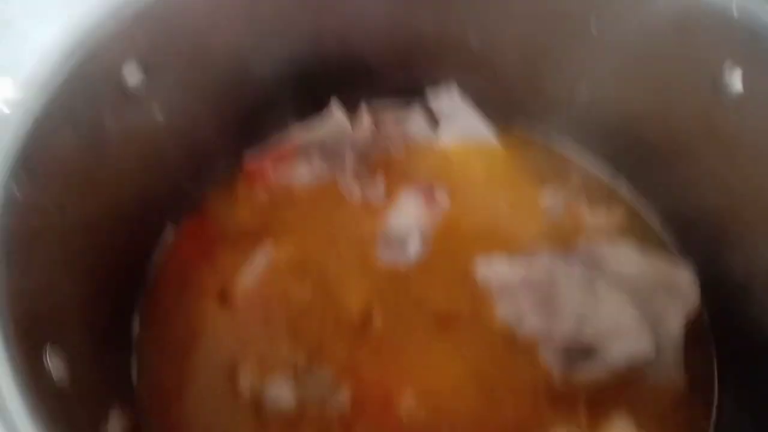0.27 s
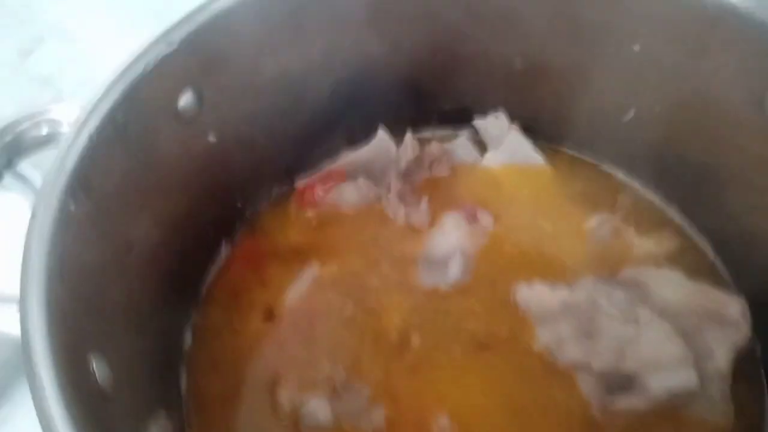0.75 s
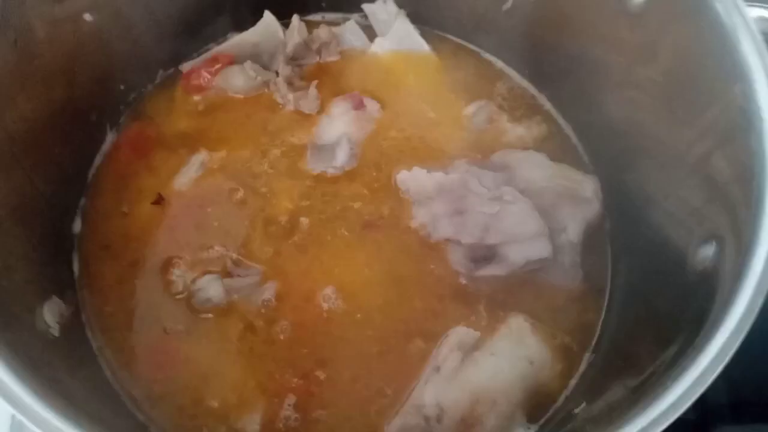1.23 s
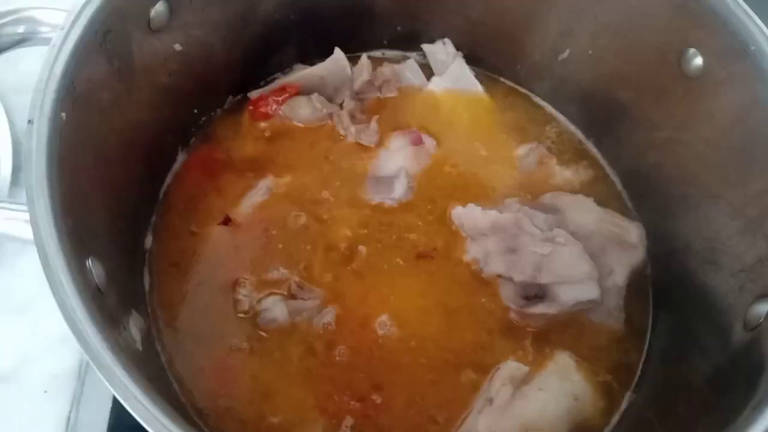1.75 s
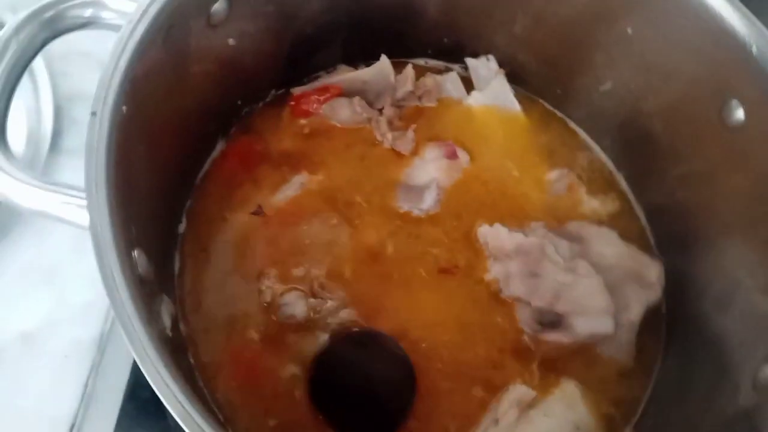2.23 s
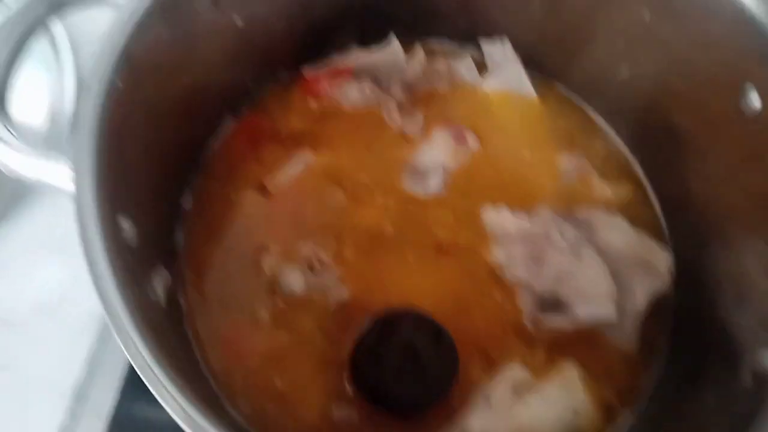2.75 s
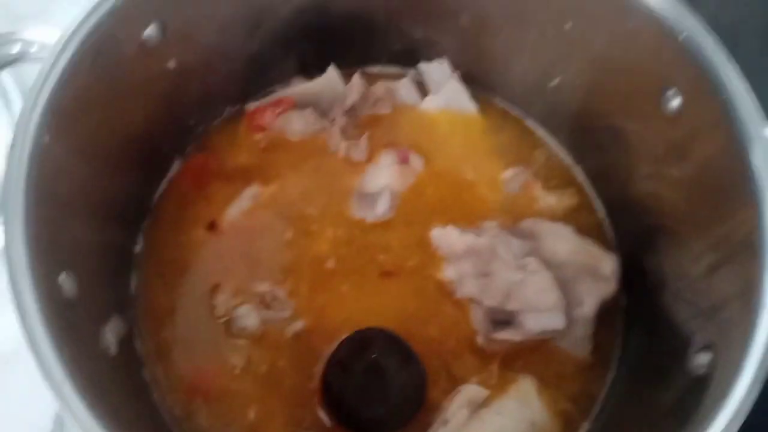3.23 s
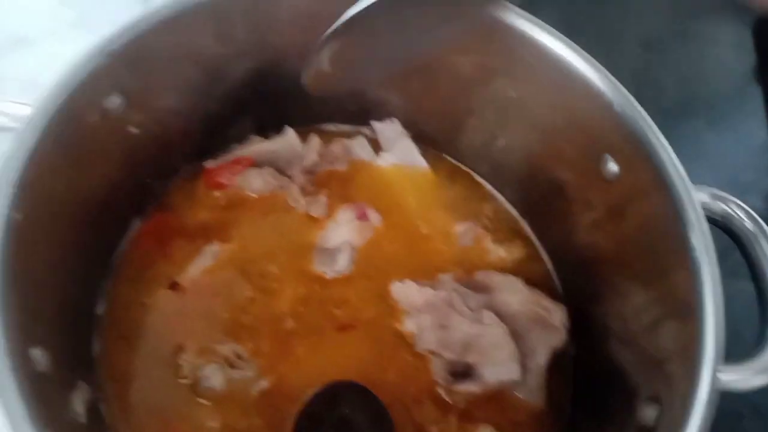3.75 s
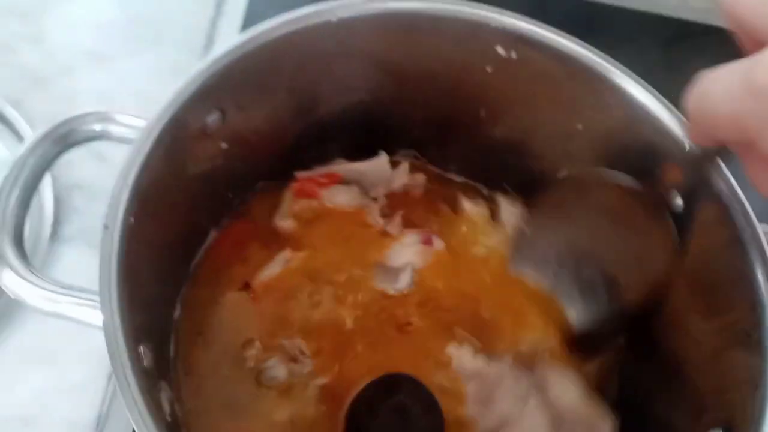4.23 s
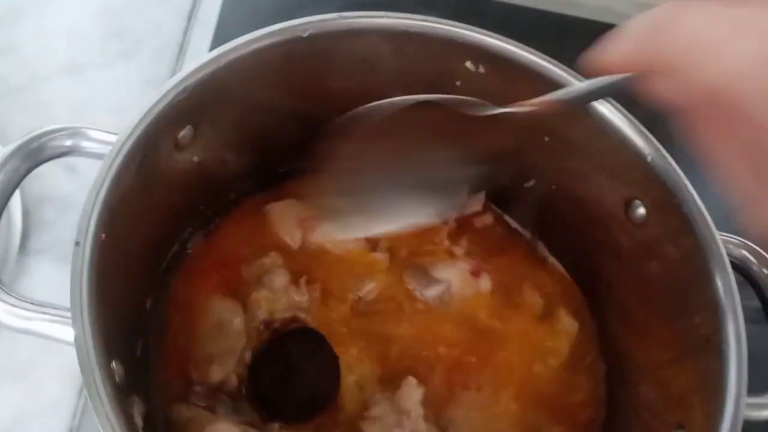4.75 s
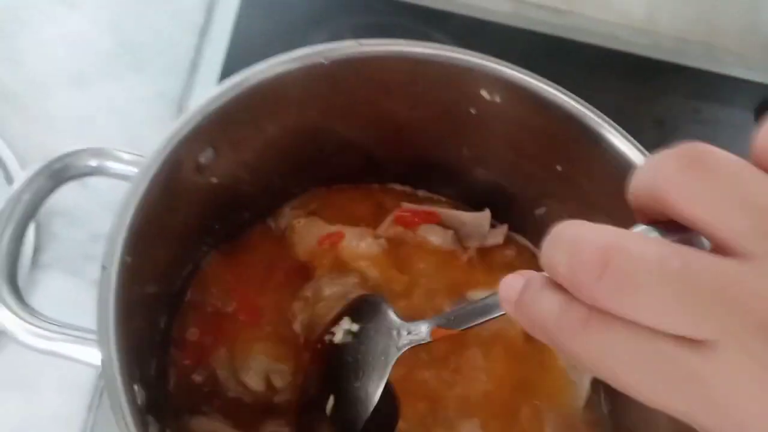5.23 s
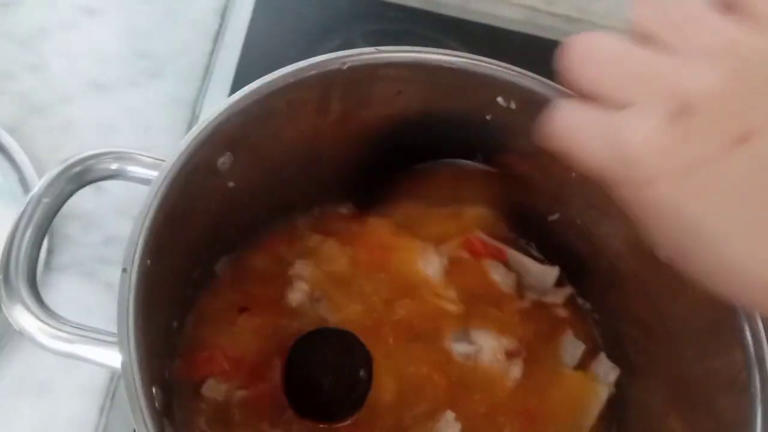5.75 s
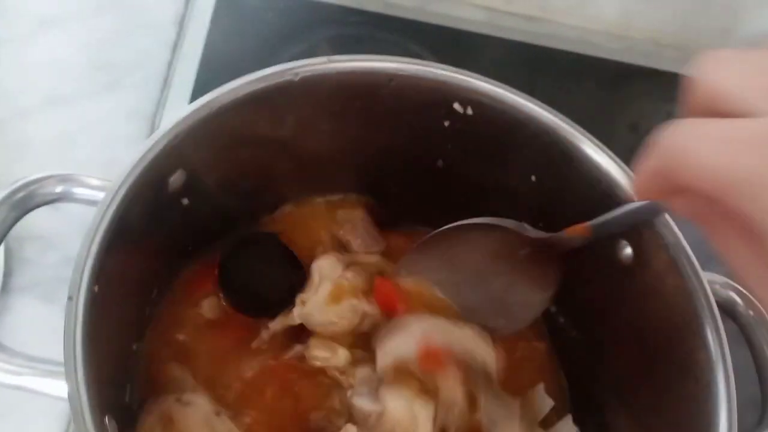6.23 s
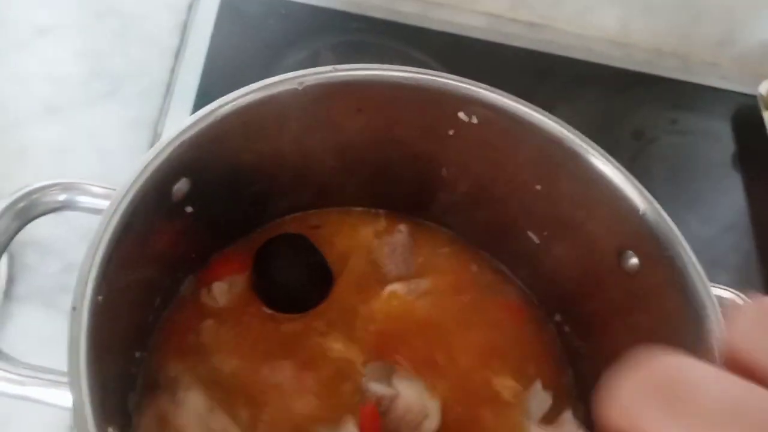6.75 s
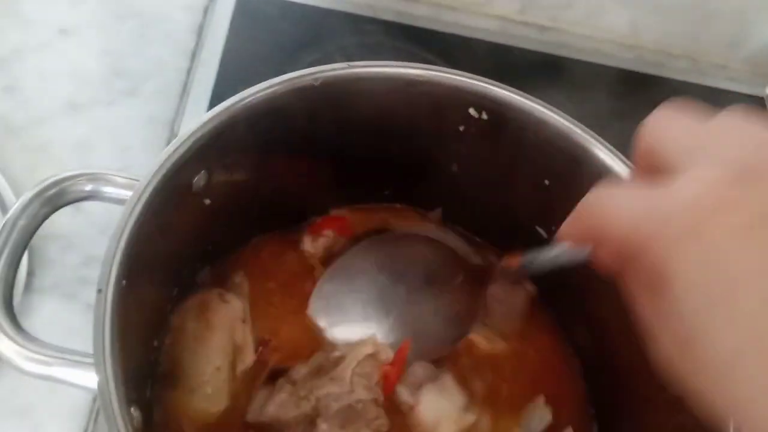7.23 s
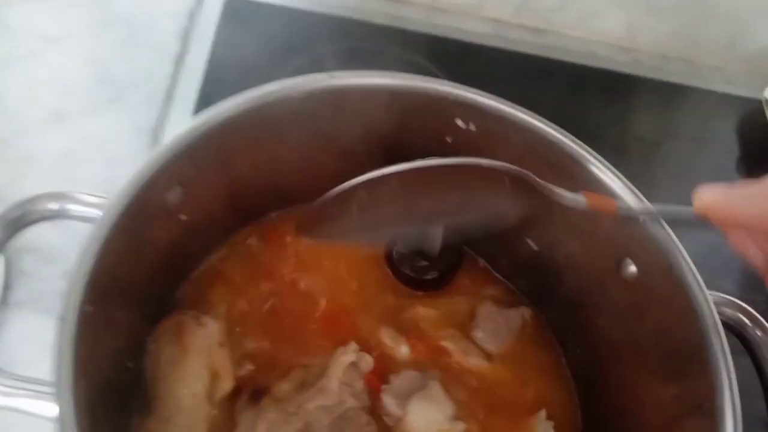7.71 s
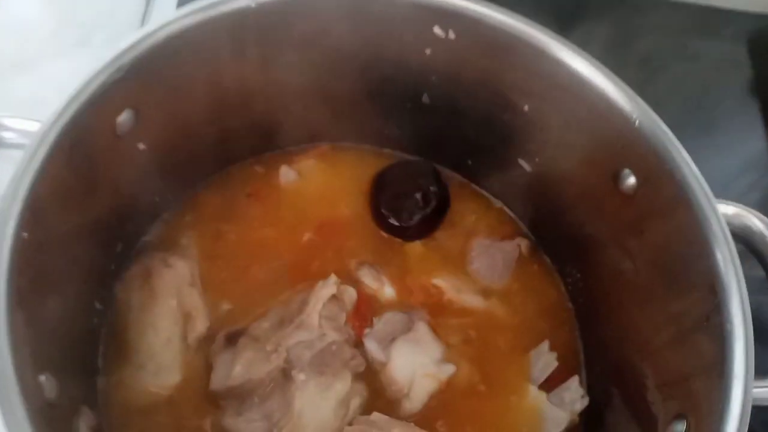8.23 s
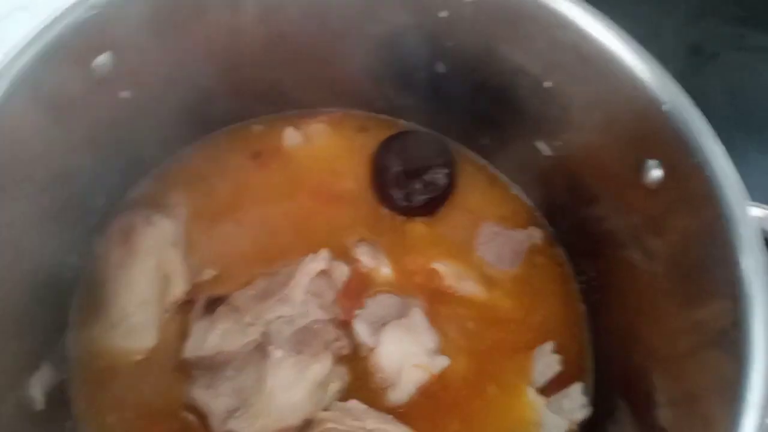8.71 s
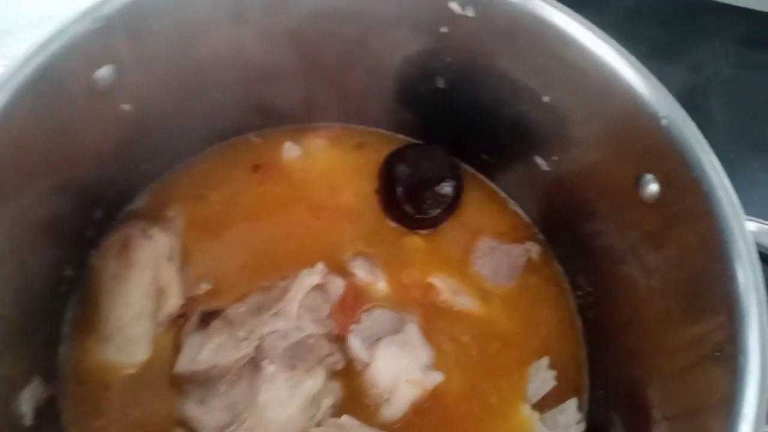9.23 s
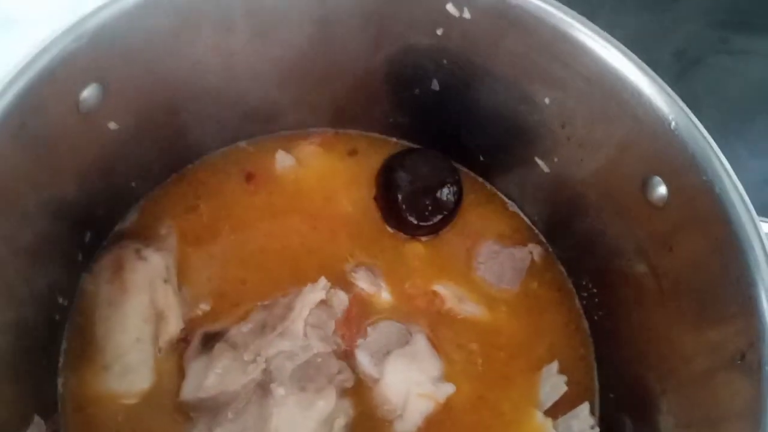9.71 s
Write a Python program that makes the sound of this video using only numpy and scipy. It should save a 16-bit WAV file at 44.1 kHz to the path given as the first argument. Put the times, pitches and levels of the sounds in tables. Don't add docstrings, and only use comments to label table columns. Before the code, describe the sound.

A small hard kitchen heard close up, with soft hiss, faint hum and low handling rumble throughout. In the first half second stew burbles weakly with a light scrape; small ticks and a brief wet scuff follow near 0.7 and 1.3 s, more ticks around 2. From 2.6 to 3.1 s a steel spoon clinks brightly on the worktop, strongest near 2.9. At 3.86 s it hits the steel pot with a loud crack and short ring, then lighter taps to 4.4 and ticks around 4.7. Gritty scraping swells from 5.1 to 6.1, with a solid knock at 5.5. A mid squeak sounds at 6.4, a loud knock pair at 6.75, then smaller knocks and a thin high squeal around 7.2. It quiets from 7.8 until piercing spoon clinks at 8.95 and 9.2, a scrape and rattling knocks at 9.3, then soft bumps and a faint squeak to the end.

```python
import sys
import numpy as np
from scipy import signal
from scipy.fft import rfft, irfft, next_fast_len
from scipy.io import wavfile
from scipy.ndimage import uniform_filter1d, minimum_filter1d

SR = 44100
rng = np.random.default_rng(int(sys.argv[2]) if len(sys.argv) > 2 else 0)


def store_pcm(level_fs):
    pcm = np.round(np.clip(level_fs, -1, 1) * 32767).astype(np.int16)
    wavfile.write(sys.argv[1], SR, np.atleast_2d(pcm).T)


def voltage_ratio(decibels):
    exponent = np.asarray(decibels, float) / 20
    return 10 ** exponent


N = 439677

# frequency in Hz, level in dB per Hz.
RUMBLE = [(15, -61.5), (25, -43), (41, 0), (59, 2), (138, 4.5), (167, -8.5), (220, -32.5), (570, -120)]
HUM = [(120, -52), (200, -21), (318, -2.5), (428, -15.5), (807, -19.5), (2500, -34), (3250, -47.5),
       (5500, -120)]
HISS = [(710, -47.5), (1200, -13), (3440, -4), (7010, 0.5), (9430, 4.5), (13100, -22), (15300, -9.5),
        (16500, -24)]
# peak in seconds, rumble in dB.
JOLTS = [(1.05, -60), (2.079, -49.5), (2.7, -47), (3.91, -39), (4.16, -45.5), (5.022, -56), (5.522, -39),
         (5.97, -53), (6.779, -54.5), (7.301, -49.5), (8.45, -73.5), (9.08, -45), (9.3, -37), (9.8, -49)]
# time in seconds, hiss in dB.
HISS_LEVEL = [(0.0, -71), (1.45, -76.5), (1.75, -67.5), (2.1, -63), (2.399, -72), (3.6, -70.5), (4.5, -70.5),
              (5.361, -71.5), (6.16, -68.5), (6.66, -68), (7.55, -75), (7.8, -78.5), (7.92, -62), (8.1, -71),
              (8.6, -66.5), (8.8, -77), (9.97, -75)]
EDGES_HZ = 200 * 2 ** np.arange(0, 6.6, .5)

# full pressure in seconds, level in dB, level at 9 kHz in dB against it,
# rise by 30 dB in seconds, hold in seconds, fall by 30 dB in seconds.
SCRAPES = [(0.0, -48, -13.5, .01, 0.038, 0.17), (0.735, -43, -3, .035, .048, .015),
           (1.29, -50, 1, .01, .06, .07), (2.1, -64.5, 18, -1.03, 0.001, 0.25),
           (2.935, -46, 4.5, 0.46, 0.0009, 0.78), (5.236, -37, -6.5, 0.16, 0.0012, -0.09),
           (5.729, -34.5, -1.5, -0.08, 0.13, 0.01), (5.96, -45, 6, 0.24, 0.039, 0.09),
           (6.95, -54.5, 1, 0, 0.066, 0.15), (9.03, -33, -4.5, 0.08, 0.084, 0.1961),
           (9.968, -47.5, 19, 0.01, 0.00093, 9)]
# start in seconds, length in seconds, centre in Hz, level in dB.
BURBLES = [(0.001, 0.07, 1600, -54), (0.09, 0.08, 2950, -74), (0.2, 0.12, 1950, -71),
           (0.215, 0.09, 1500, -70), (0.26, 0.04, 3500, -71), (0.32, 0.15, 5500, -74),
           (0.322, 0.045, 2480, -70), (0.41, 0.045, 1950, -73), (0.47, 0.13, 6800, -74),
           (0.5, 0.06, 3330, -72), (0.545, 0.11, 2300, -72), (1.28, .13, 6100, -53),
           (1.285, .12, 1100, -58)]
# start in seconds, length in seconds, pitch in Hz, level in dB.
SQUEALS = [
    (0.37, 0.17, 355, -62),
    (1.92, .1, 5700, -64),
    (2.394, 0.19, 4670, -67.5),
    (4.78, .38, 4810, -68),
    (5.015, .12, 1134, -63),
    (6.4, 0.15, 1116, -48.5),
    (6.669, 0.068, 2040, -65.5),
    (7.215, 0.3, 8850, -52),
    (7.3, 0.22, 580, -52),
    (9.62, 0.35, 4790, -65),
]
# start in seconds, crack at 5.5 kHz in dB, brightness in dB per octave,
# narrowing in dB per octave squared.
TICKS = [(0.267, -45.5, 8, 2), (0.659, -42.5, -2, 1), (1.279, -24, 7, 47), (1.915, -27.5, 18, 26),
         (2.0363, -52, 23.5, -6), (2.0943, -39, 19, -4), (2.152, -34, 9, 13), (4.634, -46, 20.5, -1),
         (4.655, -32, 3.1, 19), (4.734, -44, 14, -1), (4.749, -23.5, 12.5, 10.5),
         (4.769, -38.5, -16.5, 10.5), (4.7814, -34, 7, -1), (4.898, -51, 15, -4), (5.1202, -26.5, 22, 20),
         (5.162, -52, 22.5, 1), (5.196, -43, 34.5, 2), (5.469, -32, -1.5, 0.5), (5.931, -30.5, -6, 4),
         (6.063, -47, -29.5, 10.5), (6.108, -35, -12, 8), (6.125, -30, 10, 2), (6.2114, -47, 22, 5),
         (6.995, -26.5, 4.5, -1.3), (7.044, -49.5, 13.5, -0.5), (7.332, -48, 21, -1),
         (7.488, -52.5, 24.5, -9), (7.7135, -46, -17, 13), (9.7654, -46, 4, -5)]
# start in seconds, peak in dB, pitch in Hz.
SNAPS = [(0.6604, -42, 3170), (0.669, -46, 3500), (2.6985, -12, 6500), (2.9405, -8, 6000),
         (5.5482, -26, 2360), (5.7837, -28, 6450), (5.8041, -28, 1470), (5.8331, -26, 5680),
         (6.391, -32, 3000), (6.7445, -9, 1500), (6.988, -28, 9000), (7.0445, -36, 10000),
         (7.2155, -7, 1900), (7.2257, -15, 2200), (7.2975, -14, 2600), (7.403, -46, 8000),
         (7.418, -46, 7000), (7.463, -46, 6500), (9.2537, -8, 3300), (9.3258, -14, 3000),
         (9.331, -16, 3500), (9.3475, -11, 4000)]
# start in seconds, peak in dB, pitch in Hz, t60 in seconds.
THUDS = [(1.921, -40, 131, 0.11), (2.032, -37, 80.6, 0.12), (3.22, -45, 302, 0.097), (3.86, -26, 132, 0.27),
         (4.258, -24.5, 405, 0.02), (5.026, -33.5, 75.5, 0.049), (5.96, -39, 290, 0.075),
         (6.265, -30, 367, 0.049), (7.237, -32.5, 116, 0.075), (7.306, -28.5, 128.4, 0.054),
         (8.877, -43.5, 310, 0.057), (9.068, -30.5, 354, 0.064), (9.271, -26.5, 136.5, 0.18),
         (9.33, -23, 121.7, 0.051), (9.591, -33.5, 445, 0.051), (9.596, -35.5, 123.5, 0.17),
         (9.771, -36, 422, 0.046), (9.777, -36, 114.8, 0.18)]

# start in seconds, crack at 5.5 kHz in dB,
# brightness in dB per octave, narrowing in dB per octave squared, ring in dB.
KNOCKS = [(1.2764, -53, -6, 0.5, -59.5), (3.8564, -2.5, 5, 2, -20.5), (4.16, -34, -3, 0.3, -45),
          (4.212, -47, 5.5, -1, -54), (4.287, -34, 0, 4, -55.5), (4.3513, -49.5, 1.5, 0, -73),
          (5.23, -43.5, 6, -4.5, -63), (5.5003, -12.5, -8.5, 3.5, -30), (5.6095, -40, -7, 2.5, -45),
          (5.6982, -34, -3.5, 2, -50), (5.9575, -45, -9, 0.5, -60), (6.398, -38.5, 1, -0.5, -57),
          (6.737, -8, 4, 5, -21.5), (6.78, -20, 2, 0, -27.5), (6.9711, -40.5, 3, 11, -54),
          (7.2149, -25.5, 1.5, 0.5, -45), (7.2252, -62.5, -17, 4, -50.5), (7.296, -41, -6.5, 0, -49.5),
          (9.3018, -33.5, -5.5, 0.35, -54.5), (9.3267, -34, -11.5, 3, -68), (9.3463, -27, -1, 1.5, -37.5),
          (9.586, -50.5, -7.5, 6, -84)]
CLINKS = [(2.581, -21.5, -3.5, 2.5, -20.5), (2.6402, -19.5, 10, -3, -25.5), (2.6988, -19, 6, 0, -34.5),
          (2.9358, -6, 5.5, 0.5, -16), (3.017, -24.5, 4.5, -0.5, -28), (3.1328, -15.5, 12.5, -1, -22.5),
          (8.956, -3, 10, -1.54, -13.5), (9.0501, -41.5, -9, 2, -32), (9.1387, -35, 7, 0, -50.5),
          (9.191, -9, 5.5, 6.5, -20.5), (9.2534, -26, -14, 4.5, -39.5)]
KNOCK_SPOTS = [4, 0, 0, 0, 0, 0, 1, 2, 2, 2, 2, 1, 1, 1, 1, 3, 3, 4, 2, 2, 2, 4]
CLINK_SPOTS = [0, 2, 1, 2, 2, 3, 4, 4, 4, 5, 5]
# t60 in seconds, level in dB struck on each of five spots.
POT = [(0.35, -2.5, -14, -10.5, -10.5, -9.5), (0.22, -8, -20.5, -6.5, -22, -2),
       (0.38, -5.5, -10, -8.5, -30, -3), (0.22, -8, -11, -22.5, -29, -31),
       (0.39, -19, -14.5, -19, -27, -13.5), (0.56, -20, -7.5, -19.5, -26, 4), (0.33, 2, 1, -7.5, 8, -33),
       (0.33, -9.5, -1.5, -4.5, 14, -12), (0.32, -12.5, -10.5, -11.5, 13.5, -0.5),
       (0.54, -12, -9, -4.5, 0.5, -2), (0.25, 2, -9, -15.5, 10.5, -38), (0.21, -12, -11, -4.5, -5, -38),
       (0.082, -32, -22, -2, -32, -34), (0.59, -17, -19, -23, 12, -26),
       (0.2, -24.5, -25, -1.5, -23, -25), (0.2, -24.5, -26, -3.5, -13, -27),
        (0.2, -26, -22.5, -1, -19, -29), (0.2, -25.5, -26.5, -4, -30, -27), (0.2, -25, -24, -2.5, -19, -25),
        (0.2, -19.5, -19, -4, -8, 0), (0.3, -15, -20, -24.5, -19, -25), (0.4, -13.5, -17, -25, -14, -25)]
POT_HZ = [366.0, 560.0, 590.0, 630.0, 955.0, 1085.0, 1123.0, 1150.0, 1384.0, 1650.0, 1776.0, 1852.0, 2700.0,
          8824.0]
POT_MORE_HZ = [1914.0, 2360.0, 2512.0, 2620.0, 2914.0, 3244.0, 6050.0, 9850.0]
# t60 in seconds, level in dB struck on each of six spots.
SPOON = [(0.39, -27.5, -32, -24, -27, -21, -21.5), (0.5, -26, -29, -26.5, -24, -27.5, -20),
         (0.54, -27.5, -18, -21, -34, -22, -10.5), (0.3, -13.5, -19, -22, -16.5, -15.5, -16),
         (1, -5.5, -12.5, -20, -24, -41, -15.5), (0.3, 1.5, -11.5, -5.5, -18.5, -28.5, -35.5),
         (0.48, -7.5, -12.5, -13, -4.5, -20, -28), (0.63, -24, -18, -22.5, -8.5, -18, -29),
         (1, -22.5, -25.5, -28.5, -10.5, -6, -3.5), (0.46, -16, -23.5, -21.5, -11, -9, -3.5),
         (0.4, 2.5, -22, 0, -22.5, -14.5, -1.5), (0.92, 1.5, -13.5, -9, -13.5, -17.5, -19.5),
         (0.32, -12.5, 10, 1, 3, 10.5, -3),
         (0.2, -58, -31, -19, -12.5, -53.5, -18.5), (0.1, -28.5, -1.5, -3.5, -21.5, -12.5, 5),
          (0.3, -28, -14, -17, -25.5, -20, -22.5), (0.24, -26, -8.5, -2, -13, 5.5, 4),
          (0.27, -1, -22, -15, 6, -15.5, -1), (0.56, -26.5, -9, -0.5, -10.5, -20, -21.5),
          (0.41, -17, -2, -4.5, -6, -8, -15.5), (0.14, -43.5, -18, -11, -10, -15, -37),
          (0.16, -35, -27.5, -23, -35, -9.5, -40.5)]
SPOON_HZ = [1017.0, 1658.0, 2410.0, 2885.0, 3400.0, 3650.0, 4296.0, 4813.0, 5042.0, 5185.0, 5865.0, 6460.0,
            6590.0]
SPOON_HIGH_HZ = [7930.0, 8395.0, 8715.0, 8910.0, 9245.0, 9773.0, 10530.0, 11010.0, 11430.0]
POT_FREE = [1.05, 1.02, 0.78, 0.28, 0.64]
SPOON_FREE = [0.63, 0.69, 0.55, 1.045, 0.94, 0.98]

# frequency in Hz, t60 in seconds.
ROOM_T60 = [(200, .5), (1000, .5), (4000, .48), (9000, .38), (12000, .24), (15000, .24)]
# frequency in Hz, gain in dB.
MIC = [(200, -23.5), (400, -13), (9500, -4), (11500, -9), (12600, -22.5), (13600, -27.5), (14400, -12),
       (15500, -11.5)]
PASSBAND = [(22, -14), (32, -6), (40, -9), (50, 0), (15550, 0), (15750, -20), (16700, -22), (16850, -80)]


def rms_one(x):
    return x / np.sqrt(np.mean(x ** 2) + 1e-20)


def at_hz(points, hz):
    table_hz, value = np.array(points).T
    return np.interp(np.log(hz), np.log(table_hz), value)


def shade(x, points):
    size = next_fast_len(N + SR // 10)
    hz = np.arange(1, size // 2 + 2) * SR / size
    return irfft(rfft(x, size) * voltage_ratio(at_hz(points, hz)), size)[:N]


def drift(rate):
    knots = rng.standard_normal(int(N / SR * 60) + 2)
    smooth = rms_one(signal.lfilter([1], [1, -np.exp(-rate / 10)], knots))
    return np.interp(np.arange(N) / SR * 60, np.arange(len(knots)), smooth)


def peak_db(s, db, rise_db_s, fall_db_s):
    t = np.arange(N) / SR - s
    return db - np.maximum(-rise_db_s * t, fall_db_s * t)


def bands(size, ripple_db):
    grip = 8192
    count = size // grip + 1
    spot = np.arange(grip // 2 + 1) * SR / grip / 95
    knots = rng.standard_normal((count, int(spot[-1]) + 2)).clip(-3, 1.4)
    ripple = np.array([np.interp(spot, np.arange(len(row)), row) for row in knots])
    spectrum = rfft(rng.standard_normal((2, count, grip))) * voltage_ratio(ripple_db * ripple)
    white = irfft(spectrum, grip).reshape(2, -1)[:, :size]
    for k, (low, high) in enumerate(zip(EDGES_HZ, EDGES_HZ[1:])):
        sos = signal.butter(2, [low, high], "band", fs=SR, output="sos")
        yield np.sqrt(low * high), rms_one(signal.sosfilt(sos, white[k % 2]))


def strikes(rows, db):
    clicks = np.full(N, 1e-18)
    clicks[(np.array(rows)[:, 0] * SR).astype(int)] = voltage_ratio(db)
    return clicks


def fade(clicks, t60):
    return signal.lfilter([1], [1, -voltage_ratio(-60 / (t60 * SR))], clicks)


def ring(clicks, hz, t60):
    r, w = voltage_ratio(-60 / (t60 * SR)), 2 * np.pi * hz / SR
    return signal.lfilter([0, np.sin(w)], [1, -2 * r * np.cos(w), r * r], clicks)


def background():
    hiss_db = np.interp(np.arange(N) / SR, *np.transpose(HISS_LEVEL))
    hum_db = -72.5 + 0.25 * (hiss_db - hiss_db.mean())
    jolts = sum(voltage_ratio(peak_db(s, db, rise_db_s=174, fall_db_s=97.5)) for s, db in JOLTS)
    levels = voltage_ratio(-69) + jolts, voltage_ratio(hum_db), voltage_ratio(hiss_db)
    patches = sum(noise * np.sqrt(hz) * voltage_ratio(3.0 * drift(7)) for hz, noise in bands(size=N, ripple_db=1.5))
    sources = rng.standard_normal(N), patches, patches
    out = 0
    for spectrum, level, source in zip((RUMBLE, HUM, HISS), levels, sources):
        out = out + rms_one(shade(source, spectrum)) * level * voltage_ratio(2.5 * drift(1))
    return out


def scrape_stroke():
    pressure = []
    for s, db, _, rise, held, fall in SCRAPES:
        onset = peak_db(s, db, 30 / max(rise, .002), 0)
        release = peak_db(s + held, db, 0, 30 / max(fall, .002))
        pressure.append(np.minimum(onset, release))
    pressure = np.array(pressure)
    return pressure.max(axis=0), np.array(SCRAPES)[pressure.argmax(axis=0), 2]


def scrape_grit(low_db):
    catches = (rng.random(N) < 160 / SR) * voltage_ratio(0.77 * rng.exponential(1, N).clip(0, 3))
    return (.5 + 0.39 * fade(catches, 0.058)) * uniform_filter1d(voltage_ratio(low_db), 200)


def blow_db(rows, hz):
    octave = np.clip(np.log2(hz / 5500), -3, .9)
    return np.array([db + bright * octave - max(narrow, -2) * octave ** 2
                     for s, db, bright, narrow, *_ in rows])


def crack_shape(hz):
    slower = (3000 / hz) ** 0.016 / (1 + np.power(hz / 14000, 4))
    clink, knock, tick = [strikes(rows, blow_db(rows, hz)) for rows in (CLINKS, KNOCKS, TICKS)]
    shape = voltage_ratio(-3.0) * fade(clink, 0.092 * slower)
    shape += voltage_ratio(-2.0) * fade(knock, 0.078 * slower)
    shape += voltage_ratio(-15.0) * fade(tick, 0.051 * slower)
    shape += fade(voltage_ratio(-22) * clink + voltage_ratio(-18.5) * knock + voltage_ratio(-40.0) * tick, 0.49 * slower)
    shape += voltage_ratio(1.5) * fade(clink / 2 + knock, 0.0079)
    return uniform_filter1d(shape, size=44, origin=21)


def contacts():
    out, (low_db, high_db) = 0, scrape_stroke()
    grit = scrape_grit(low_db)
    for hz, noise in bands(size=N, ripple_db=4.5):
        rub_db = np.interp(np.log(hz), np.log([300, 1500, 5000]), [-26, -8, -6])
        rub_db += high_db.clip(-30, 30) * np.clip(np.log2(hz / 4000), -.5, 1)
        rub_db += 4.0 * drift(30)
        out = out + noise * (crack_shape(hz) + voltage_ratio(rub_db) * grit)
    return out


def burbles_and_squeals():
    out = np.zeros(N + SR)
    for rows, t60 in ((BURBLES, .01), (SQUEALS, .05)):
        for s, length, hz, db in rows:
            size = int(length * SR)
            tone = rms_one(ring(rng.standard_normal(SR // 2), hz, t60))[:size]
            swell = np.sin(np.pi * np.linspace(0, 1, size) ** 0.27)
            out[int(s * SR):][:size] += voltage_ratio(db) * tone * swell
    return out[:N]


def snaps():
    return sum(ring(strikes([row], row[1]), row[2], 9 / row[2]) for row in SNAPS)


def body(rows, spots, modes_hz, modes, free, split, twin_db, flutter, wander):
    out, modes = np.zeros(N + SR), np.array(modes)
    twin_hz = modes_hz * (1 + split * (-1) ** np.arange(len(modes)))
    hz = np.r_[modes_hz, twin_hz][:, None]
    t60 = np.r_[modes[:, 0], .6 * modes[:, 0]][:, None].clip(0, .62)
    chance = rng.standard_normal((len(rows), len(hz), 60))
    for k, (s, *_, ring_db) in enumerate(rows):
        damped = [later[0] - s for later, spot in zip(rows[k:], spots[k:]) if spot != spots[k]]
        left = min(damped + [.62, (ring_db + 95) / 110])
        t = np.arange(int(left * SR)) / SR
        knot, part = np.divmod(t * 70, 1)
        knot = knot.astype(int)
        knots = 1 + flutter * chance[k] * np.arange(60).clip(0, 4) / 4
        waver = knots[:, knot] * (1 - part) + knots[:, knot + 1] * part
        walk = wander * np.cumsum(chance[k, ::-1, ::-1], axis=1)
        slip = walk[:, knot] * (1 - part) + walk[:, knot + 1] * part - walk[:, :1]
        struck_db = modes[:, 1 + spots[k]]
        mode_db = np.r_[struck_db, struck_db + twin_db]
        decay = np.exp(-np.log(1000) / (t60 * free[spots[k]]) * t)
        sound = voltage_ratio(ring_db + mode_db) @ (waver * decay * np.sin(2 * np.pi * hz * t + slip))
        out[int(s * SR):][:len(t)] += sound * np.clip((left - t) / .02, 0, 1)
    return out[:N]


def pot_ring():
    return body(KNOCKS, KNOCK_SPOTS, POT_HZ + POT_MORE_HZ, POT, POT_FREE,
                split=.018, twin_db=-2, flutter=.95, wander=1.0)


def thuds():
    out = 0
    for row in THUDS:
        out = out + ring(strikes([row], row[1] + 1.0), row[2], row[3])
    return signal.lfilter([.03], [1, -.97], out)


def spoon_ring():
    return body(CLINKS, CLINK_SPOTS, SPOON_HZ + SPOON_HIGH_HZ, SPOON, SPOON_FREE,
                split=.006, twin_db=-2, flutter=.8, wander=.8)


def kitchen(x):
    t = np.arange(SR) / SR
    tail = sum(noise * voltage_ratio(-60 * t / at_hz(ROOM_T60, hz)) * np.sqrt(hz)
               for hz, noise in bands(size=SR, ripple_db=5.5))
    tail = tail * np.clip(t / 0.0011, 0, 1) ** 2
    return signal.fftconvolve(x, tail / np.sqrt(np.sum(tail ** 2)))[:N]


def scene():
    rings = spoon_ring() + pot_ring()
    broad = shade(contacts(), MIC) + snaps()
    wet = kitchen(voltage_ratio(-8) * rings + voltage_ratio(-13.5) * broad)
    mix = rings + broad + wet + thuds() + burbles_and_squeals() + background()
    return shade(mix, PASSBAND)[None]


def roll_off(x):
    return signal.sosfilt(signal.butter(12, 16820, fs=SR, output="sos"), x)


def record(dry):
    limit_db, release_db_s, squeeze, ceiling = -25.5, 187, .45, .56
    ahead = int(.022 * SR)
    level_db = 10 * np.log10(uniform_filter1d(dry[0] ** 2, 128) + 1e-12)
    slope = release_db_s * np.arange(N) / SR
    held_db = np.maximum.accumulate(level_db + slope) - slope
    over_db = np.maximum(held_db - limit_db, 0)
    cut_db = minimum_filter1d(-squeeze * over_db, ahead, origin=-(ahead // 2))
    cut_db = uniform_filter1d(cut_db, ahead, origin=(ahead - 1) // 2)
    cut_db = np.r_[cut_db[ahead // 4:], np.zeros(ahead // 4)]
    return roll_off(ceiling * np.tanh(dry * voltage_ratio(cut_db) / ceiling))


dry = scene()
out = record(dry)
store_pcm(out)
```